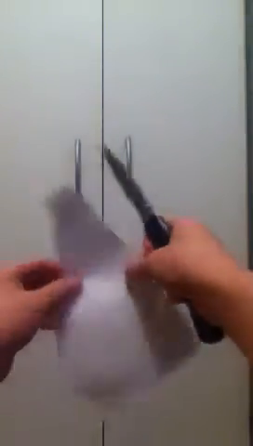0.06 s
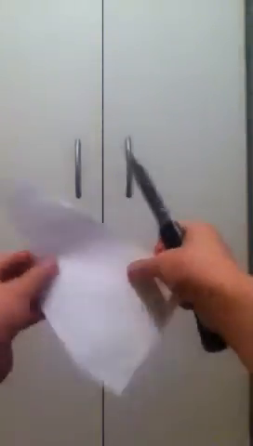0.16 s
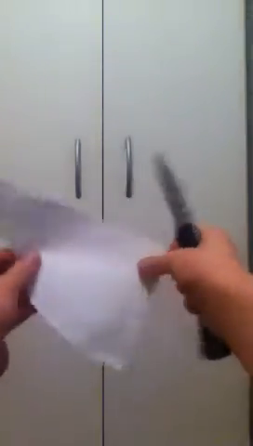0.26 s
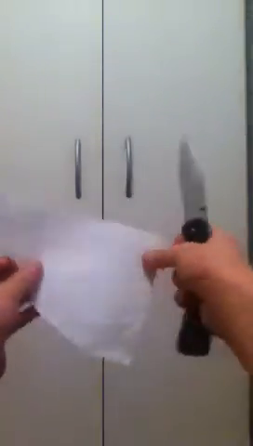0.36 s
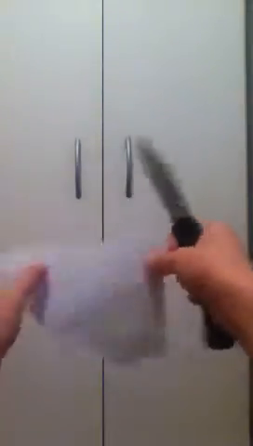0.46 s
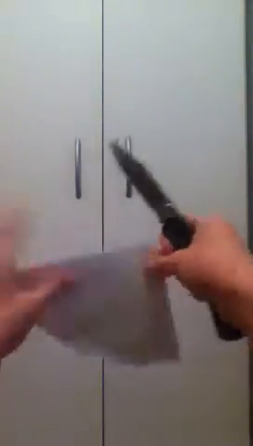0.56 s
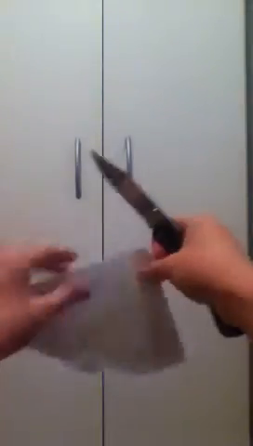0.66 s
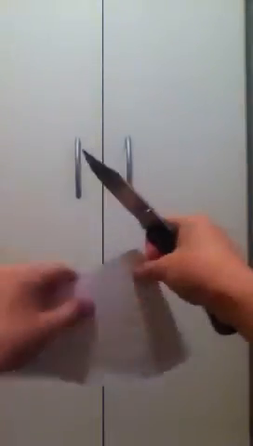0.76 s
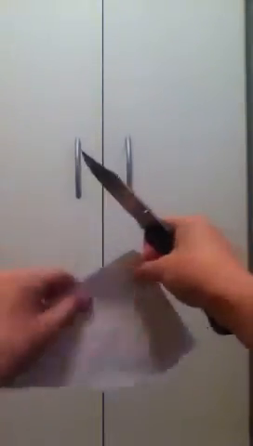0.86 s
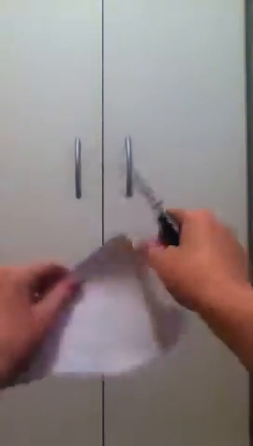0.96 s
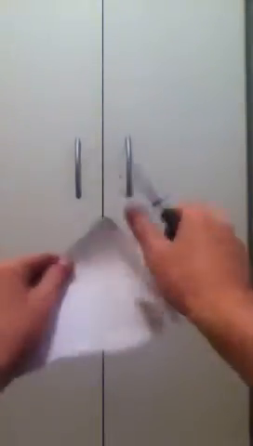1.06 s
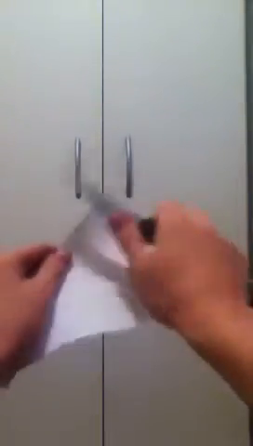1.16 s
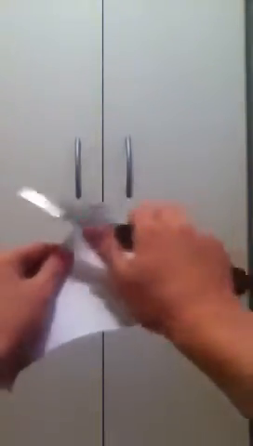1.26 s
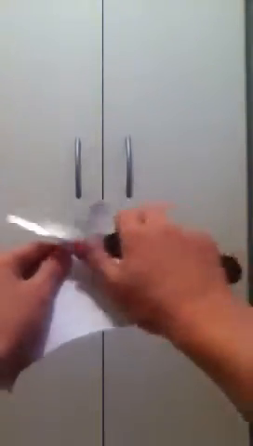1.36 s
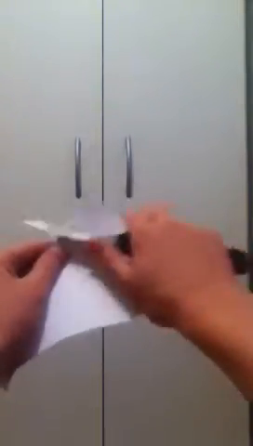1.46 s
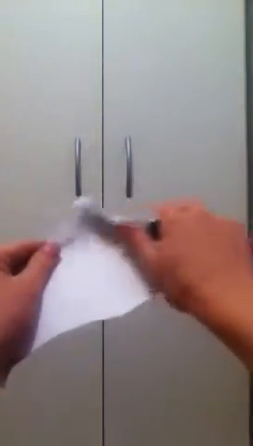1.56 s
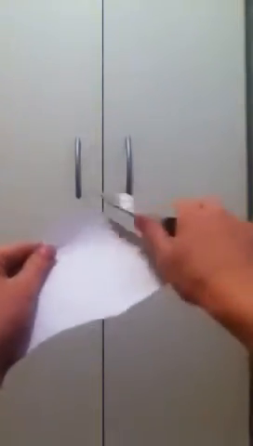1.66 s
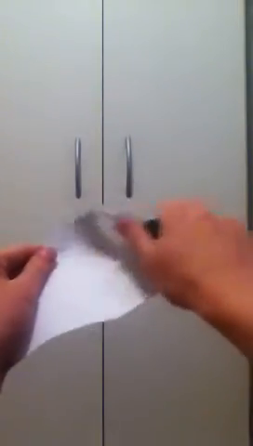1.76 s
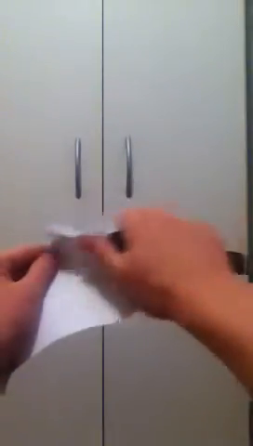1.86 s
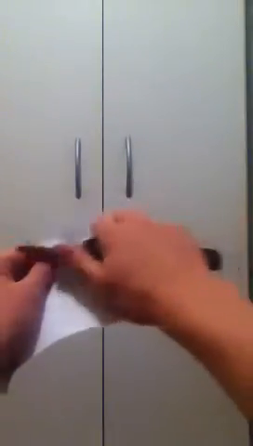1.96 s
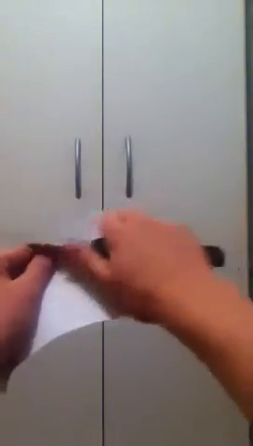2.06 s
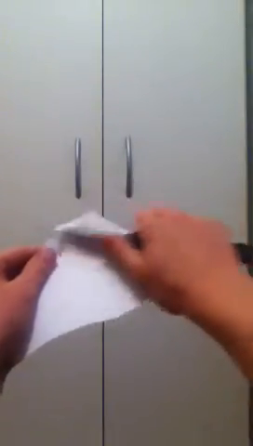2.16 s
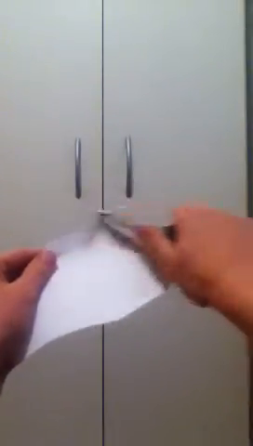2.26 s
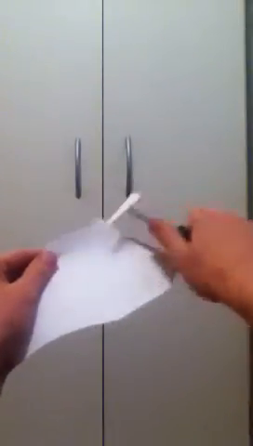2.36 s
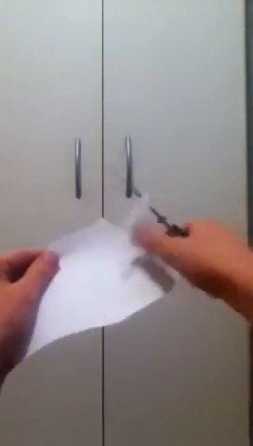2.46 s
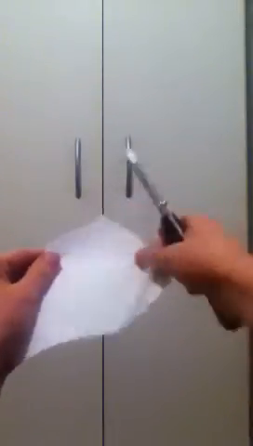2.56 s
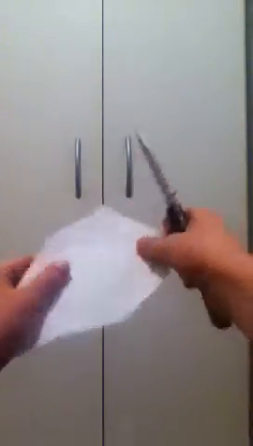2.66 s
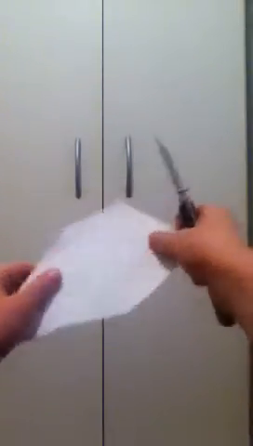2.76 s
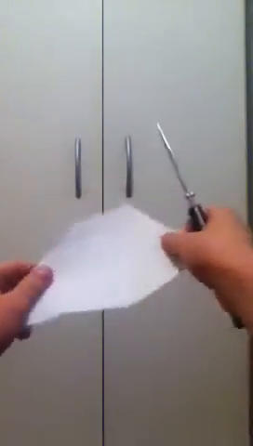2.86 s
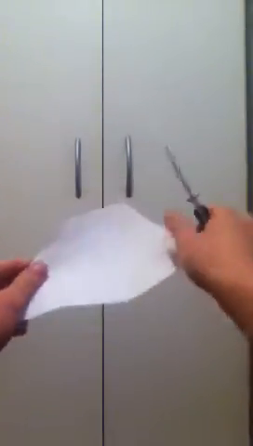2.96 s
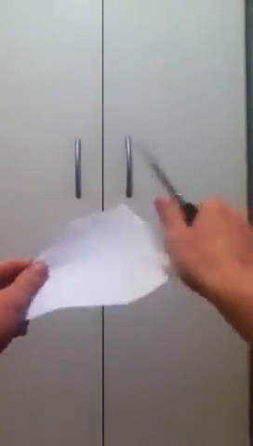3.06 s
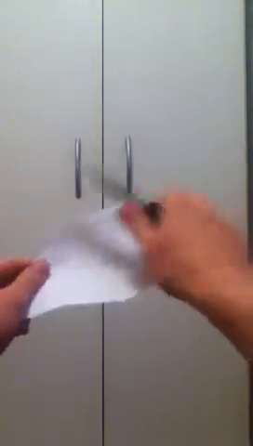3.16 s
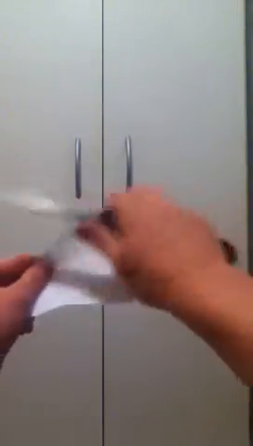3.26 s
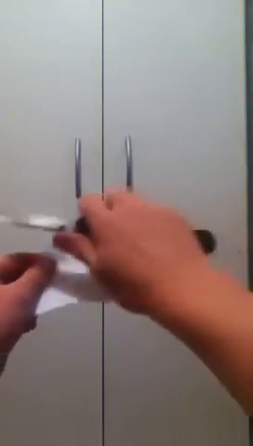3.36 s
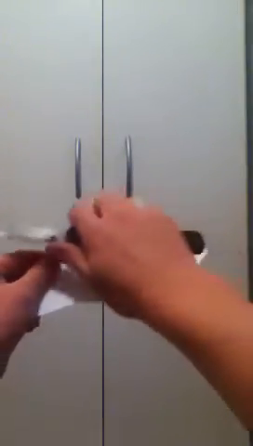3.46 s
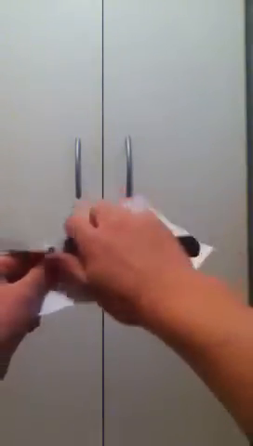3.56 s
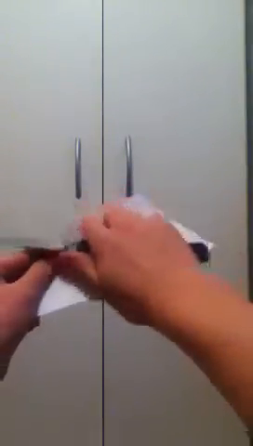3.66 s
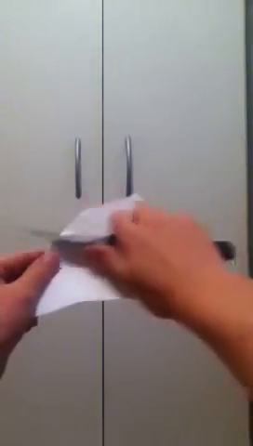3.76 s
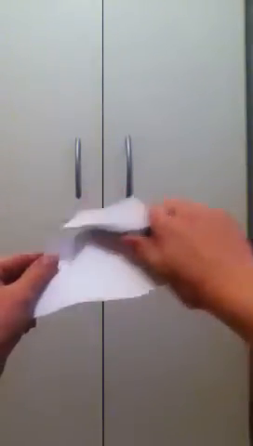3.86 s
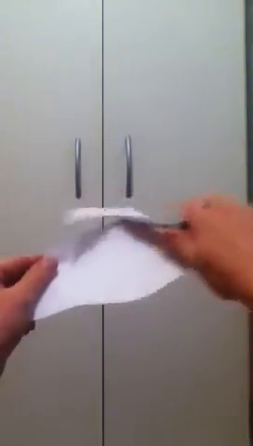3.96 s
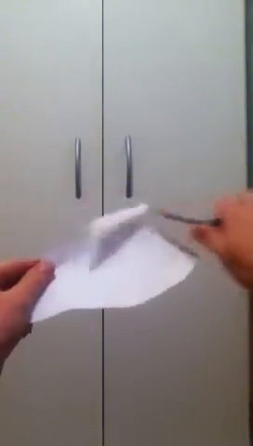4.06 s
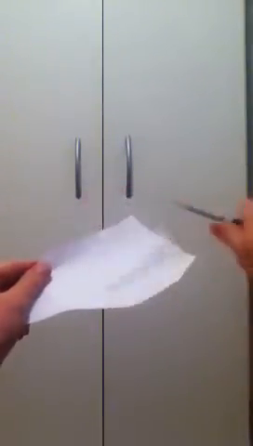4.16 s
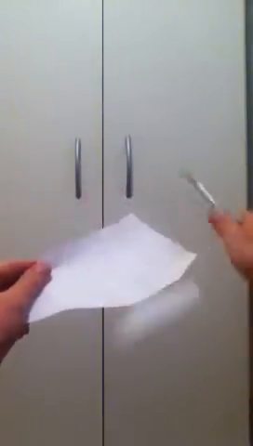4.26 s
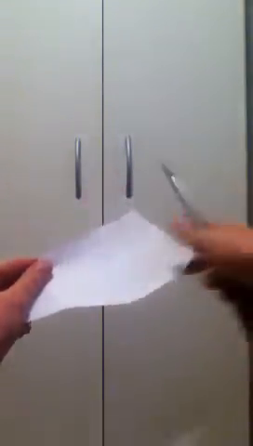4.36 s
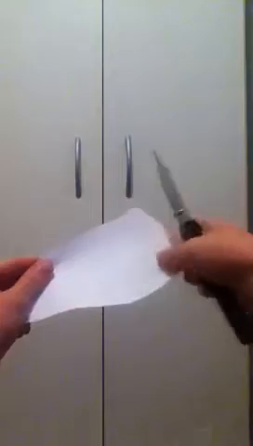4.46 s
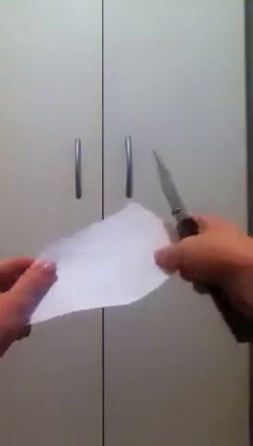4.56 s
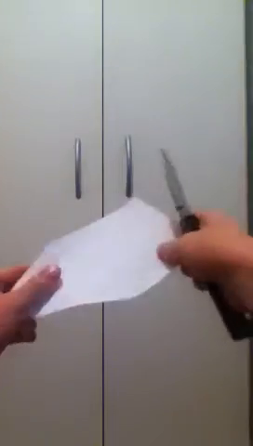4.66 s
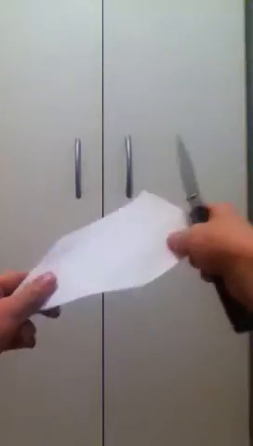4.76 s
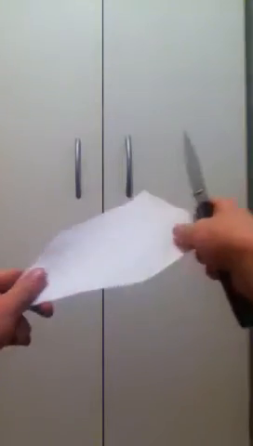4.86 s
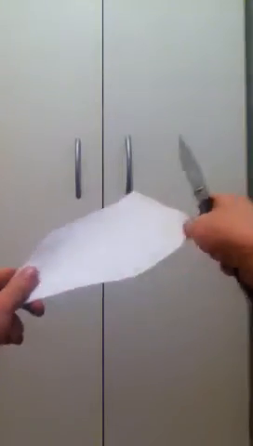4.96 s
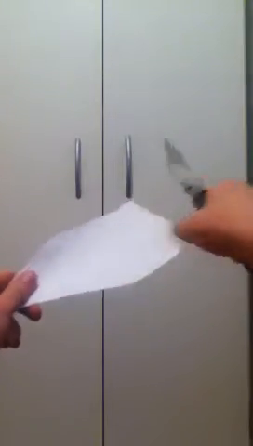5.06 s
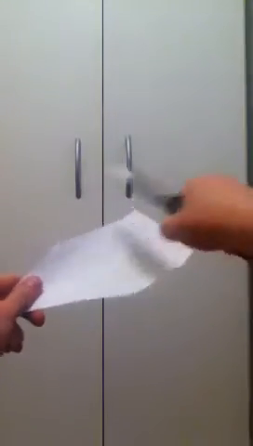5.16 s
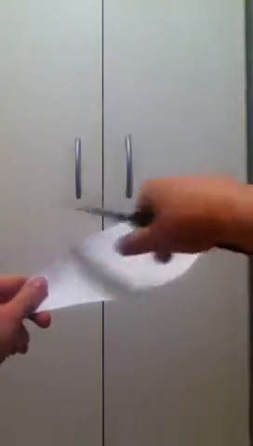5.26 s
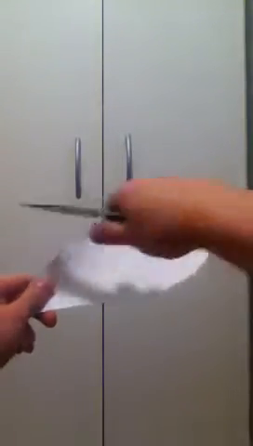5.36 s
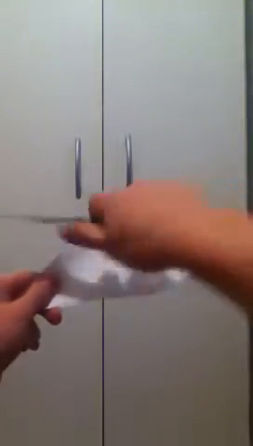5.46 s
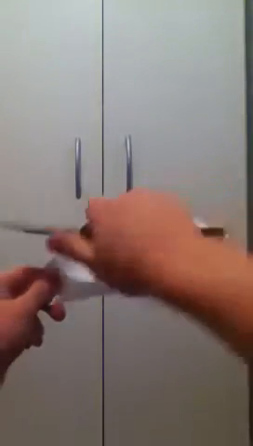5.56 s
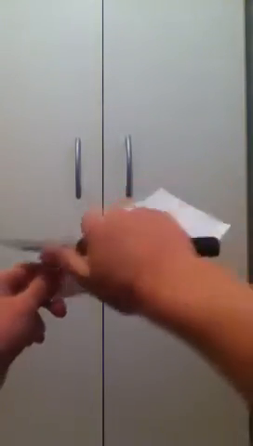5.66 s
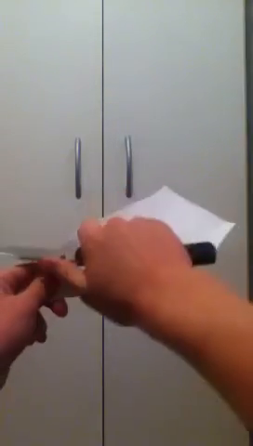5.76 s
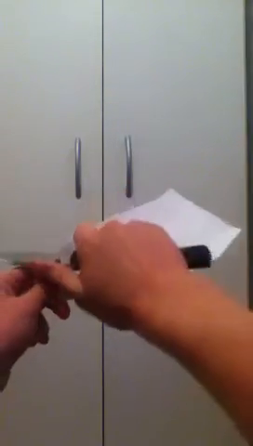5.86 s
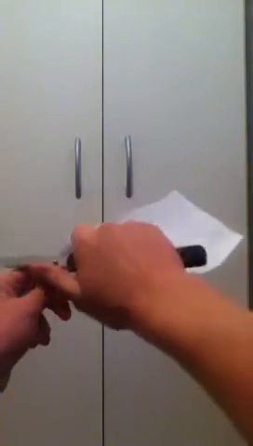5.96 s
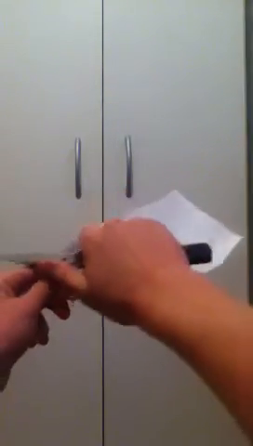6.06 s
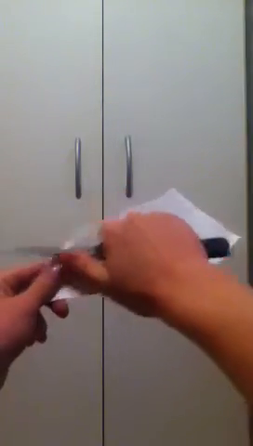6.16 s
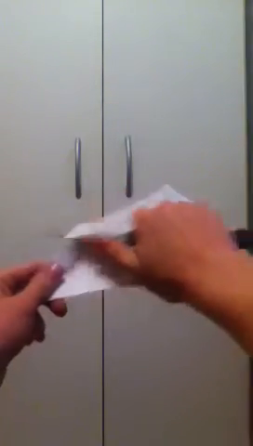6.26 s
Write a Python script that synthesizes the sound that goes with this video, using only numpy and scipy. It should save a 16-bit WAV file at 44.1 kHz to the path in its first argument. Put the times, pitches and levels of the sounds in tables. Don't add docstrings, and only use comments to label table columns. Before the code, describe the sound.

Close, dry paper handling and four bright, hissing knife cuts through a thin sheet, one slower, over low rumble and faint hiss indoors.

```python
import sys
import numpy as np
from scipy import signal
from scipy.io import wavfile
from scipy.ndimage import uniform_filter1d

SR = 44100
rng = np.random.default_rng(int(sys.argv[2]) if len(sys.argv) > 2 else 0)


def field_ratio(decibels):
    return 10 ** (np.asarray(decibels, dtype=float) / 20)


def wav_out(sig):
    wavfile.write(sys.argv[1], SR, np.round(np.clip(np.atleast_2d(sig).T, -1, 1) * 32767).astype(np.int16))


N = 278271

# [t/s, pressure level/dB, blade-face slide re pressure/dB, curl ring f/Hz]
CUT_PATHS = [
    [(1.531, -44, -7, 3090), (1.537, -33, -9.5, 3070), (1.559, -26.5, -7, 2920), (1.597, -26.5, -2.5, 2700),
     (1.641, -25, -2, 3020), (1.661, -22, -11.5, 2960), (1.671, -28.5, -7, 2960)],
    [(2.147, -52, 0, 2810), (2.155, -35, -5.5, 2800), (2.217, -26.5, 1, 2860), (2.251, -25, -5, 3600),
     (2.287, -26.5, -0.5, 3690), (2.317, -22.5, -8, 3700), (2.332, -35.5, -5, 3520)],
    [(3.765, -43, -4, 3400), (3.807, -32, -11, 2800), (3.907, -27, -2.5, 2800), (4.001, -29, -2, 3150),
     (4.029, -30, -8.5, 3020), (4.105, -35, -4.5, 2900), (4.112, -46, -4, 2910)],
    [(6.142, -51, -8, 3300), (6.154, -48, -1.5, 3350), (6.186, -39.5, -6, 2560), (6.252, -30, -18, 2610),
     (6.31, -34, 1, 3100)],
]
# [top air/dB, loose flap/dB, catches re pressure/dB, edge ring at mid-cut f/Hz,
# flap change by the end/dB]
BLADE_TONES = [(-6, -21, 6, 7540, 2.5), (-10.5, -14, 4.5, 7050, -40), (-7.5, -32.5, 1.5, 8470, 26.5),
               (-11, -22.5, 0, 7100, 5)]
# [t/s, f/Hz]
BLADE_CATCHES = [
    [(1.559, 2980), (1.599, 2400), (1.612, 5070), (1.633, 2700), (1.657, 2650)],
    [(2.176, 2860), (2.208, 2830), (2.223, 2700), (2.256, 3950), (2.268, 7100), (2.29, 6500), (2.294, 4100),
     (2.307, 2420), (2.31, 4040)],
    [(3.788, 4300), (3.814, 2630), (3.854, 2760), (3.907, 8700), (3.92, 2760), (3.934, 3000), (3.987, 8000),
     (4.005, 3770), (4.033, 2480)],
    [(6.169, 4600), (6.247, 2310), (6.296, 2520)],
]
# [t/s, level/dB, f/Hz, length/ms]
TUGS_AND_KNOCKS = [(1.646, -17.5, 3800, 5), (1.6605, -14.5, 3530, 2.16), (1.665, -20.5, 1870, 2.3),
                   (2.316, -31, 2300, 5.9), (2.3195, -16.5, 2850, 1.39), (2.325, -28, 1380, 4.9),
                   (2.328, -32, 950, 4.44), (1.9225, -40, 4200, 2.5), (2.2, -35, 3740, 2.1),
                   (.11, -38, 3300, 2.88), (3.81, -43.5, 980, 24), (.11, -45, 124.5, 25)]
# [start t/s, length/s, skin hiss level/dB, crackle re hiss/dB]
FINGER_SLIDES = [(.005, 0.1, -59.5, 1.5), (0.087, 0.061, -58.5, 10.5), (0.171, 0.081, -56.5, 0),
                 (0.203, 0.11, -50.5, -3), (0.269, 0.11, -55, -0.5), (0.4, 0.036, -63.5, 7),
                 (0.439, 0.1, -59.5, -2), (0.834, 0.063, -57.5, -3), (0.923, 0.12, -51.5, -4),
                 (1.072, .11, -55.5, -3), (1.895, 0.058, -60.5, 8), (2.43, .11, -60, -6),
                 (2.602, 0.1, -48, -3), (2.661, 0.042, -41.5, 1), (2.687, .05, -45, 1),
                 (2.739, 0.068, -47, 1.5), (2.779, 0.12, -49.5, -4), (2.87, 0.096, -52, -2),
                 (3.429, 0.13, -61, -3), (4.222, .05, -52.5, -9), (4.269, .11, -55.5, -4.5),
                 (4.5, 0.13, -55.5, -3), (4.745, 0.099, -56.5, -3), (4.844, .06, -54, -4),
                 (4.869, 0.056, -53.5, 8.5), (4.9, 0.11, -57, -17), (5.208, .09, -64, -10)]
# [start t/s, length/s, level/dB]
PAGE_FLEXES = [(0, .03, -56), (0.087, .08, -40.5), (.2, 0.059, -50.5), (0.268, 0.16, -49), (.405, .17, -48),
               (0.844, 0.066, -47.5), (0.916, 0.034, -52), (1.897, 0.047, -52), (2.432, 0.058, -56),
               (2.609, 0.038, -46), (2.677, .05, -55), (2.739, .06, -46), (2.858, 0.097, -50.5),
               (4.224, 0.059, -56), (4.308, 0.066, -56), (4.434, 0.077, -52.5), (4.508, 0.22, -50.5),
               (4.728, 0.045, -58), (4.861, .06, -48.5)]
# [t/s, peak level/dB, snap f/Hz, rattle f/Hz]
DRY_TICKS = [(.2, -33, 5400, 6790), (.414, -28, 5600, 1440), (0.8499, -33, 3300, 1410),
             (.853, -31.5, 4530, 1770), (.9105, -45, 3200, 1300), (0.972, -23.5, 4600, 2300),
             (1.753, -39, 9300, 8200), (2.7446, -16.5, 5000, 1360), (2.7453, -24, 7800, 7960),
             (2.879, -34, 1000, 1400), (3.4629, -39.5, 5600, 4600), (4.23, -39.5, 3200, 1700),
             (4.462, -43.5, 3200, 1540), (4.5677, -30, 6200, 1640), (4.7443, -34.5, 3600, 4940),
             (4.9132, -34, 6000, 830)]
# [t/s, peak level/dB, snap f/Hz, rattle f/Hz]
LOOSE_POPS = [(0.026, -45.5, 3100, 1410), (0.0991, -28.5, 1630, 2570), (.124, -34.5, 1580, 1560),
              (0.1538, -40, 1650, 1360), (0.1974, -36.5, 8100, 6740), (.306, -36.5, 1770, 1450),
              (.4306, -43, 1180, 680), (.448, -50, 1300, 560), (1.921, -38, 2900, 3210),
              (2.626, -30.5, 3900, 1590), (2.8944, -43, 1490, 560), (3.7688, -32, 3800, 4040),
              (4.5364, -46.5, 2400, 1520), (4.543, -46, 5700, 540), (4.8825, -31.5, 2600, 1500),
              (4.8854, -31.5, 1850, 720), (5.2335, -52, 6800, 1400)]
# [t/s, peak level/dB, snap f/Hz, rattle f/Hz]
TAUT_PINGS = [(.109, -25, 2680, 3200), (.239, -43, 2590, 1440), (0.3088, -39, 1510, 1490),
              (1.902, -20.5, 3440, 3120), (1.9239, -32, 2900, 1540), (4.3325, -37, 1860, 2000)]
# [t/s, peak level/dB, snap f/Hz, rattle f/Hz]
FIST_CRUSH = [(2.615, -38, 2000, 5650), (2.63, -25, 2200, 2480), (2.6355, -6, 3500, 2500),
              (2.6436, -18, 5600, 1690), (2.6702, -20, 5500, 8500), (2.6748, -21, 4900, 2290),
              (2.68, -30, 3800, 3940), (2.6885, -32, 4500, 3520), (2.6964, -21, 5500, 6070),
              (2.7026, -20.5, 5440, 2350), (2.706, -21, 4900, 2360), (2.7076, -23, 3600, 2360),
              (2.7232, -36, 2700, 3900)]
# [t/s, peak level/dB, snap f/Hz, rattle f/Hz]
FAINT_RATTLE_TICKS = [(.0836, -30, 3700, 3110), (5.9333, -27.5, 5200, 3900), (4.2283, -44, 4400, 1650),
                      (.51, -46, 2500, 740)]
# [snap length/cycles, rattle at -29 dB peak/dB, rattle lost per dB of
# peak/dB]
CREASE_KINDS = [(0.91, -16, 0.24), (1.26, -5, -0.01), (2.08, -17, 0.1), (1.05, -15, 0.5), (1.05, -26, 0.63)]
# [f/Hz, level/dB, time to fall 60 dB/s]
SHEET_MODES = [(364, 4, 0.037), (745, 0, 0.046), (1484, 0, 0.037), (2440, 6.5, 0.011), (3060, 8.5, 0.014)]
# [f/Hz, time to fall 60 dB/s]
ROOM_DECAY = [(300, 0.26), (1300, 0.2), (3500, 0.15), (9000, 0.19), (15000, 0.19)]
# [f/Hz, level/dB]
MIC_TONE = [(500, -1), (1200, -1.5), (1600, 2.5), (3000, -3), (5000, -1.5), (8000, -0.5), (10000, 1),
            (12000, -2), (15500, -7.5)]
# [f/Hz, level per Hz/dB]
AIR_TONE = [(25, -17), (45, -15), (62, -1.5), (92, 2.5), (125, -1), (155, -1), (250, -2), (400, -5.5),
            (530, -9), (700, -12), (1600, -15.5), (5000, -18.5), (8000, -16.5), (16000, -24)]
# [from t/s, to t/s, treble level/dB]
DULL_MOMENTS = [(.186, .196, -3), (1.905, 1.917, -4), (2.135, 2.144, -30), (3.76, 3.764, -30),
                (5.92, 5.931, -7)]


def evened(x):
    return x / np.sqrt(np.mean(x ** 2) + 1e-20)


def read(points, hz):
    f, value = np.transpose(points)
    return np.interp(np.log(hz + 1), np.log(f + 1), value)


def add(mix, s, sound):
    part = mix[round(s * SR):][:len(sound)]
    part += sound[:len(part)]


def columns(rows):
    s, *rest = np.transpose(rows)
    t = np.arange(s[0], s[-1], 1 / SR)
    return [np.interp(t, s, column) for column in rest]


def wander(n, ms):
    size = max(int(ms * SR / 1000), 1)
    smooth = uniform_filter1d(rng.standard_normal(n), size)
    return evened(uniform_filter1d(smooth, size))


def grains(n, per_s, spread_db, clump_db, clump_ms):
    size_db = spread_db * np.minimum(rng.exponential(1, n), 4)
    size_db = size_db + clump_db * wander(n, clump_ms)
    sign = np.sign(rng.random(n) - 0.5)
    happens = rng.random(n) < per_s / SR
    return field_ratio(size_db) * sign * happens


def resonate(x, hz, width):
    turn = np.exp(2j * np.pi * np.cumsum(hz * np.ones(len(x))) / SR)
    r = np.exp(-np.pi * width / SR)
    smooth = signal.lfilter([1], np.poly([r, r]), x / turn)
    return evened((turn * smooth).real)


def cut(rows, top_db, flap_db, edge_hz, freed_db):
    level_db, edge_db, sheet_hz = columns(rows)
    n = len(level_db)
    done = np.arange(n) / n
    edge_hz = edge_hz * (0.75 + 0.25 * np.minimum(2 * done, 1))
    loose_db = freed_db * done ** 2.47
    top_db = top_db + 0.35 * edge_db + 0.22 * loose_db
    flap_db = flap_db + loose_db

    breaks = grains(n, per_s=8000, spread_db=2.0, clump_db=0.5, clump_ms=1.6)
    slides = grains(n, per_s=15000, spread_db=2.4, clump_db=1.3, clump_ms=1.5)

    sheet = resonate(breaks, 3300, 4000)
    sheet += 0.75 * resonate(breaks, sheet_hz * (1 + 0.05 * wander(n, 12)), 1300)
    sheet += 0.25 * resonate(breaks, 1650 * (1 + 0.097 * wander(n, 13.0)), 930)
    sheet = signal.sosfilt(signal.butter(2, 1250, "high", fs=SR, output="sos"), sheet)

    edge = resonate(slides, 7400, 6000)
    edge += 0.9 * resonate(slides, edge_hz * (1 + 0.04 * wander(n, 12)), 2200)
    top = resonate(slides + 0.5 * breaks, 12400, 9700)
    flap = resonate(breaks, 820, 640)
    layers = evened(sheet) + field_ratio(edge_db) * evened(edge) + field_ratio(top_db) * top + field_ratio(flap_db) * flap
    return field_ratio(level_db) * layers * signal.windows.tukey(n, 150 / n)


def catch(level_db, hz, ms, noise):
    n = min(max(int(2 * ms * SR / 1000), 40), len(noise))
    ring = resonate(noise, hz, 0.24 * hz)[-n:]
    return field_ratio(level_db - 5) * evened(ring * np.hanning(n))


def stroke(start, length, peak, *levels_db):
    ends = [(0, -9.5), (np.clip(peak, 0.05, 0.95), 0), (1, -12)]  # (share of length, dB)
    return [(start + share * length, *(np.array(levels_db) + db)) for share, db in ends]


def move(rows):
    rustle_db, hiss_db, flap_db = columns(rows)
    n = len(hiss_db)
    rustle = resonate(grains(n, per_s=3900, spread_db=2.0, clump_db=0.5, clump_ms=6.4), 2480, 4000)
    hiss = resonate(grains(n, per_s=9000, spread_db=2.5, clump_db=3.0, clump_ms=6.8), 6400, 8200)
    flap = resonate(grains(n, per_s=2500, spread_db=2.0, clump_db=4.0, clump_ms=11.6), 243, 880)
    layers = field_ratio(rustle_db) * rustle + field_ratio(hiss_db) * hiss + field_ratio(flap_db - 1.5) * flap
    return layers * signal.windows.tukey(n, 500 / n)


def snap(peak_db, snap_hz, cycles, rattle_db, rattle_hz, noise):
    t = np.arange(len(noise)) / SR - 80 / SR
    phase = 2 * np.pi * snap_hz * t - np.pi / 2
    flip = -np.sin(phase) * np.exp(-(phase / (1.43 * cycles ** 1.97)) ** 2 / 2)

    after = np.maximum(t - 0.0003, 0)
    rattle = 1.02 * resonate(noise, rattle_hz, 0.25 * rattle_hz)
    rattle += 0.89 * resonate(noise, snap_hz, 1.44 * snap_hz)
    rattle *= field_ratio(-60 * after / 0.013)
    for hz, db, t60 in SHEET_MODES:
        near_db = -9 * abs(np.log2(hz / rattle_hz))
        rattle += 0.75 * field_ratio(db + near_db - 60 * after / t60) * np.sin(2 * np.pi * hz * after)
    rattle *= np.minimum(after / 0.00023, 1)
    return field_ratio(peak_db) * (flip / abs(flip).max() + field_ratio(rattle_db + 1.0) * rattle)


def room(x):
    taps = np.zeros(SR // 2)
    at = np.arange(200, len(taps) - 20, 20)
    taps[at + rng.integers(0, 20, len(at))] = rng.choice([-1., 1.], len(at))
    hz, t, z = signal.stft(taps, SR, nperseg=256)
    fade = field_ratio(-60 * t / read(ROOM_DECAY, hz)[:, None])
    tail = signal.istft(z * fade, SR, nperseg=256)[1]
    return signal.fftconvolve(x, tail / np.linalg.norm(tail))[:N]


def air():
    frames, hz = N // 512 + 5, np.fft.rfftfreq(2048, 1 / SR)
    a, b, patches = rng.standard_normal((frames, len(hz), 3)).T
    patches = evened(uniform_filter1d(uniform_filter1d(patches, 9, 0), 9, 1))
    lumps_db = 1.9 * patches / (1 + (hz[:, None] / 900) ** 2)
    z = (a + 1j * b) * field_ratio(read(AIR_TONE, hz)[:, None] + lumps_db)
    noise = signal.istft(z, nperseg=2048, noverlap=1536)[1][:N]
    return field_ratio(-57.5) * evened(noise)


def scene():
    paper, tugs = np.zeros(N), list(TUGS_AND_KNOCKS)
    for rows, blade, catches in zip(CUT_PATHS, BLADE_TONES, BLADE_CATCHES):
        top_db, flap_db, catch_db, edge_hz, freed_db = blade
        add(paper, rows[0][0], cut(rows, top_db, flap_db, edge_hz, freed_db))
        times, pressure_db = np.transpose(rows)[:2]
        tugs += [(s, np.interp(s, times, pressure_db) + catch_db, hz, 4.0) for s, hz in catches]
    for (s, level_db, hz, ms), noise in zip(tugs, rng.standard_normal((len(tugs), 4000))):
        add(paper, s - ms / 1000, catch(level_db, hz, ms, noise))

    for s, length, db, crackle_db in FINGER_SLIDES:
        add(paper, s, move(stroke(s, length, 0.35, db + crackle_db, db, db - 11.5)))
    for s, length, db in PAGE_FLEXES:
        add(paper, s, move(stroke(s, length, 0.17, db - 13, db - 25, db)))

    creases = [DRY_TICKS, LOOSE_POPS, TAUT_PINGS, FIST_CRUSH, FAINT_RATTLE_TICKS]
    for table, (cycles, rattle_db, lost) in zip(creases, CREASE_KINDS):
        noises = rng.standard_normal((len(table), 3000))
        for (s, db, hz, rattle_hz), noise in zip(table, noises):
            sound = snap(db, hz, cycles, rattle_db - lost * (db + 29), rattle_hz, noise)
            add(paper, s - 80 / SR, sound)

    hz = np.linspace(0, SR / 2, 513)
    mic = signal.firwin2(255, hz, field_ratio(read(MIC_TONE, hz)), fs=SR)
    paper = signal.oaconvolve(paper, mic, "same")
    paper = signal.sosfilt(signal.butter(2, 140, "high", fs=SR, output="sos"), paper)
    return (paper + field_ratio(-10.5) * room(paper) + air())[None]


def band_limit(x):
    return signal.sosfilt(signal.butter(12, 16470, fs=SR, output="sos"), x)


def record(dry):
    t = np.arange(N) / SR
    dull_db = sum(db * ((t > s0) & (t < s1)) for s0, s1, db in DULL_MOMENTS)
    bass = signal.oaconvolve(dry, signal.firwin(255, 900, fs=SR)[None], "same")
    dulled = bass + (dry - bass) * uniform_filter1d(field_ratio(dull_db), 40)
    top_cut = signal.firwin(801, 15730, window=("kaiser", 10), fs=SR)
    mix = signal.oaconvolve(dulled, top_cut[None], "same")
    return band_limit(mix)


dry = scene()
out = record(dry)
wav_out(out)
```